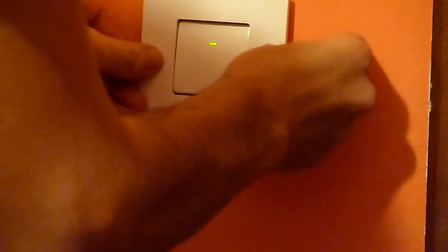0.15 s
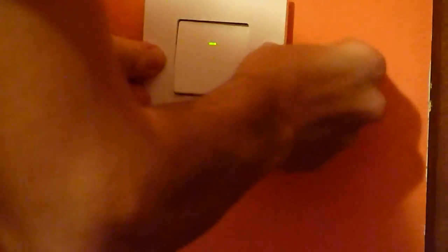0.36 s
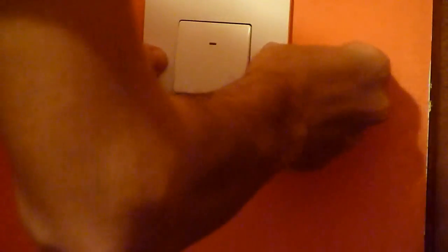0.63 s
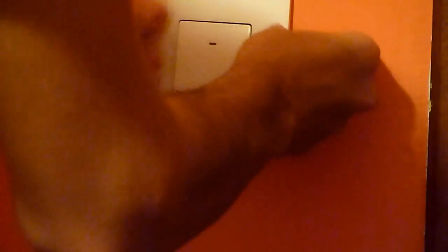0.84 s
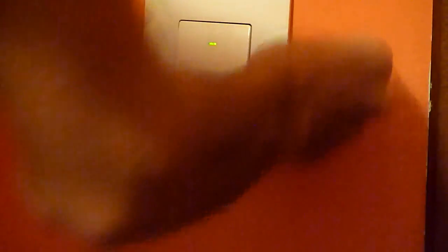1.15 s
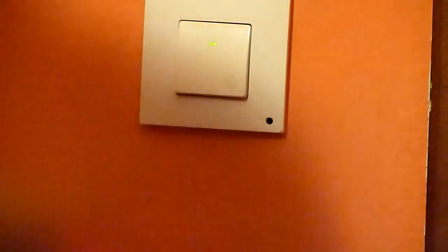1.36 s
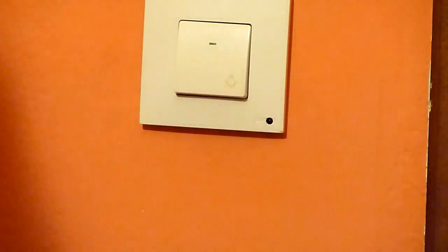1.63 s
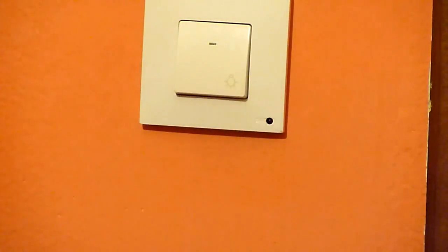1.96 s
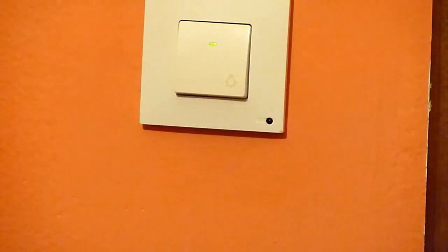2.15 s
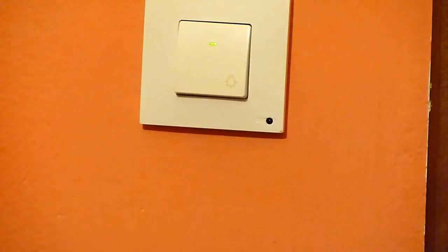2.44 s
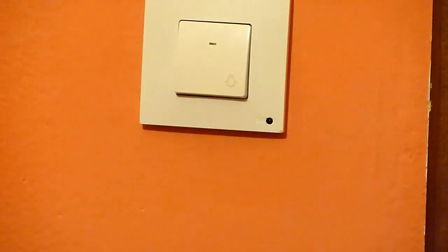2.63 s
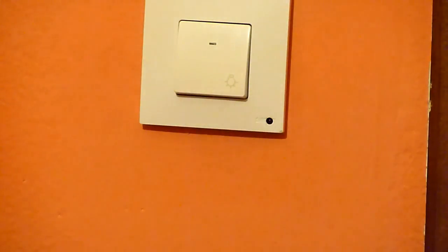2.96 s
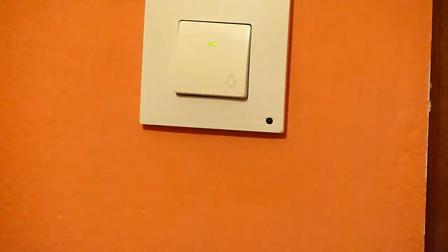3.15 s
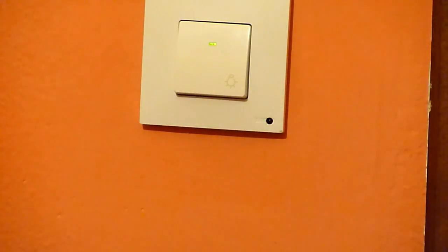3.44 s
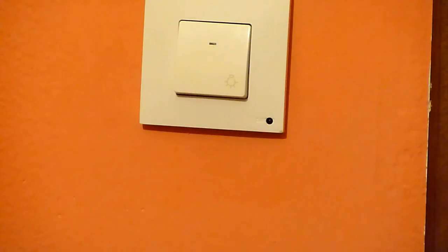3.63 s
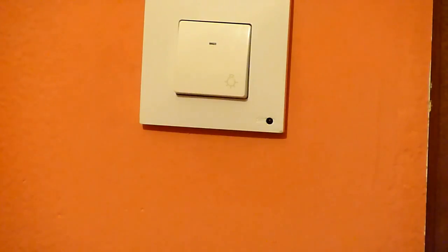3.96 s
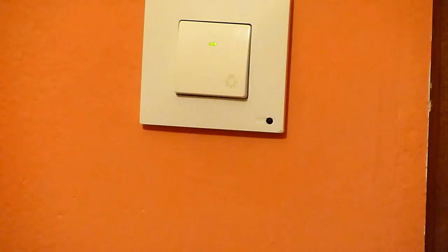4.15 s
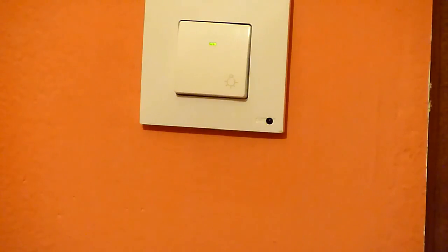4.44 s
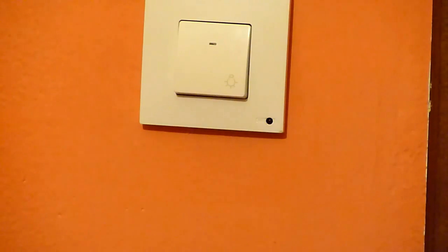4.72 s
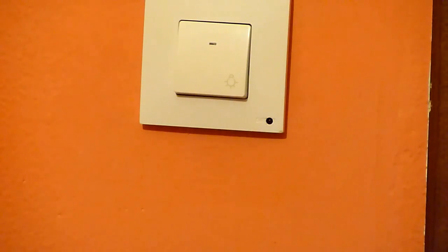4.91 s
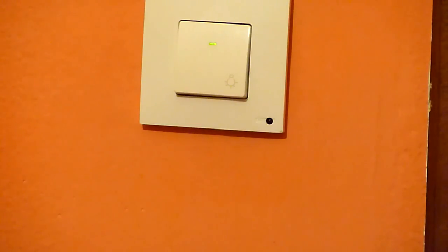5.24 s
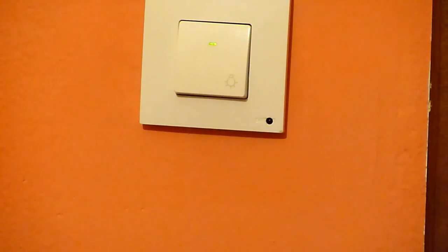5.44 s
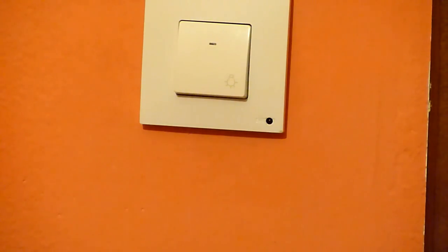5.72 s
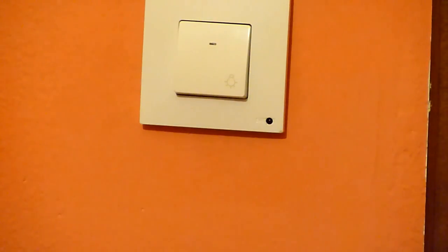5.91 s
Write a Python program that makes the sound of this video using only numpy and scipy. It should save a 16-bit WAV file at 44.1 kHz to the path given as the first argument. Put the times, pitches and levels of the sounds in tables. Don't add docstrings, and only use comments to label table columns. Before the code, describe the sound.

A plastic wall button snaps loudly up close in a small bare room, soft footsteps and cloth rustle follow, then a relay drops with a rattle.

```python
import sys
import numpy as np
from scipy import signal
from scipy.fft import rfft, irfft, next_fast_len
from scipy.io import wavfile
from scipy.ndimage import map_coordinates

SR = 44100
rng = np.random.default_rng(int(sys.argv[2]) if len(sys.argv) > 2 else 0)


def dump(signal):
    limited = np.clip(np.atleast_2d(signal).T, -1, 1)
    pcm = np.round(limited * 32767).astype(np.int16)
    wavfile.write(sys.argv[1], SR, pcm)


def undo_db(level):
    steps = np.asarray(level, float) / 20
    return 10 ** steps


N = 268128


def unit(x):
    return x / np.sqrt(np.mean(x ** 2) + 1e-20)


def along(points, hz):
    point_hz, value = np.transpose(points)
    return np.interp(np.log(hz + 1), np.log(point_hz + 1), value)


def wobble(knots_per_s):
    knots = rng.standard_normal(int(N * knots_per_s / SR) + 4)
    return map_coordinates(knots, [np.arange(N) * knots_per_s / SR])


def roll(x):
    return 1 / (1 + np.sqrt(2) * 1j * x - x * x)


def filtered(x, response):
    n = x.shape[-1]
    size = next_fast_len(n + 8192)
    return irfft(rfft(x, size) * response(np.fft.rfftfreq(size, 1 / SR)), size)[..., :n]


def resonances(modes):
    def mode(f, k, center_hz, width_hz, level_db):
        damping = 1j * f * width_hz
        return (-1) ** k * undo_db(level_db) * damping / (center_hz * center_hz - f * f + damping)
    return lambda f: sum(mode(f, k, *row) for k, row in enumerate(modes))


# pitch_hz, likeness_0_to_1
PORT_LIKENESS = [(100, 0.93), (400, 1), (1200, 0.91), (2400, 0.73), (4500, 0.36), (8000, 0.12),
                 (14000, 0.11)]


def paired(pair, spectrum):
    def mid_side(hz):
        angle = np.arccos(np.clip(along(PORT_LIKENESS, hz), -1, 1)) / 2
        return undo_db(along(spectrum, hz)) * [np.cos(angle), np.sin(angle)]
    mid, side = filtered(pair, mid_side)
    return np.array([mid + side, mid - side])


def noise(spectrum):
    return unit(paired(rng.standard_normal((2, N)), spectrum))


# pitch_hz, t60_s
ROOM_DECAY = [(200, 0.62), (700, 0.22), (3000, 0.22), (6000, 0.21), (12000, 0.18)]


def in_room(blow, wet_db, spread_s):
    n = len(blow)
    age_s = np.arange(n) / SR
    hz, frame_s, grid = signal.stft(rng.standard_normal((2, n)), SR, nperseg=256)
    decay = undo_db(-60 * frame_s / along(ROOM_DECAY, hz)[:, None])
    tail = signal.istft(grid * decay, SR, nperseg=256)[1][:, :n]
    thickening = 1 - np.exp(-age_s / np.clip(spread_s, 2e-4, 1))
    tail = paired(tail * thickening, [(1, 0)])
    scatter = rng.standard_normal((2, n)) * undo_db(-60 * age_s / 0.016)
    scatter = filtered(scatter / np.linalg.norm(scatter[0]), lambda f: -(f / 7500) ** 2 * roll(f / 7500))
    direct = filtered(signal.unit_impulse(n), lambda f: roll(f / 7500)) + scatter
    echo = direct + undo_db(wet_db) * tail / np.linalg.norm(tail[0])
    return signal.fftconvolve(blow[None], echo, axes=1)[:, :n]


def add(track, start_s, sound):
    part = track[:, round(start_s * SR):][:, :sound.shape[1]]
    part += sound[:, :part.shape[1]]


def swells(peaks, rise_db_s, fall_db_s, rest_db):
    peak_s, level_db = np.transpose(peaks)[:, :, None]
    late_s = np.arange(N) / SR - peak_s
    slope_db_s = np.where(late_s < 0, -rise_db_s, fall_db_s)
    return np.sqrt(undo_db(rest_db) ** 2 + np.sum(undo_db(level_db - slope_db_s * late_s) ** 2, axis=0))


def hardened(contacts, top_hz, softens):
    return [(start_s, peak_db, top_hz * undo_db(softens * peak_db)) for start_s, peak_db in contacts]


def mechanism(contacts, modes, wet_db, trim_db):
    track, blow = np.zeros((2, N)), signal.unit_impulse(SR // 3)
    for start_s, peak_db, hard_hz in contacts:
        housing = resonances([(hz, width_hz, db + rng.normal(0, 1.5)) for hz, width_hz, db in modes])
        ring = filtered(blow, lambda f: housing(f) * roll(f / hard_hz) ** 2)
        ring = undo_db(peak_db + trim_db) * ring / np.abs(ring).max()
        add(track, start_s, in_room(ring, wet_db, spread_s=0.0013))
    return track


def soft_contacts(rows):
    track, blow = np.zeros((2, N)), signal.unit_impulse(SR // 3)
    for start_s, level_db, low_hz, high_hz, edge_db, scrape_s in rows:
        def response(f):
            band = roll(f / high_hz) ** 4 * (1j * f / low_hz) ** 2 * roll(f / low_hz)
            edge = undo_db(edge_db) * 1j * f / (6000 + 1j * f) * roll(f / 10500) ** 2
            return band + edge
        rub = filtered(blow, response)
        rub = undo_db(level_db + 16) * rub / np.linalg.norm(rub)
        add(track, start_s, in_room(rub, wet_db=12, spread_s=scrape_s))
    return track


# pitch_hz, level_db_rms, unsteadiness_db
HUM_TONES = [(119.8, -55.5, 1.5), (191, -64.5, 2.5), (210.4, -69.5, 1.5), (267.5, -71.5, 3),
             (315.4, -73.5, 4), (592, -76, 4)]


def hum():
    t_s = np.arange(N) / SR
    tones = np.zeros(N)
    for hz, level_db, loose_db in HUM_TONES:
        gain = undo_db(level_db + 2.5 + loose_db * wobble(5))
        tones += gain * np.sin(2 * np.pi * hz * t_s + 0.21 * loose_db * wobble(4.16))
    return tones


# pitch_hz, density_db_per_hz
AIR_SPECTRUM = [(20, -9), (40, -10.5), (90, -7), (140, 3), (172, 8), (230, -4), (320, -1.5), (600, -3.5),
                (900, -8.5), (1400, -28.5), (2500, -34.5), (5000, -45)]


def air():
    return undo_db(-58.5 + 2.5 * wobble(3.15)) * noise(AIR_SPECTRUM)


# pitch_hz, density_db_per_hz
HISS_SPECTRUM = [(30, 6), (300, 6.5), (1200, 7.5), (2500, 1), (6000, -3.5), (14000, -6.5), (15500, -12)]


def hiss():
    white = rng.standard_normal((2, N))
    return undo_db(-60.5) * unit(filtered(white, lambda hz: undo_db(along(HISS_SPECTRUM, hz))))


# start_s, end_s
FOCUS_HUNTS = [
    (.005, .25),
    (1.925, 6.05),
]
# pitch_hz, width_hz, level_db
LENS_OUT_MODES = [(3290, 60, 3), (3390, 60, 5)]
# pitch_hz, width_hz, level_db
LENS_BACK_MODES = [(1590, 40, 3), (3390, 60, -6)]


def focus():
    starts_s = np.concatenate([np.arange(start_s, end_s, .16) for start_s, end_s in FOCUS_HUNTS])
    steps_s = starts_s[:, None] + np.arange(5) / 99.6
    buzz = np.zeros(N)
    for delay_s, modes in ((0, LENS_OUT_MODES), (.08, LENS_BACK_MODES)):
        at = np.round((steps_s + delay_s) * SR).astype(int).ravel()
        strength = undo_db(1.2 * rng.standard_normal(len(at)))
        buzz += filtered(np.bincount(at, strength, N + SR)[:N], resonances(modes))
    phase_rad = np.array([[1.25], [-1.25]])
    return undo_db(-23) * filtered(buzz, lambda f: np.exp(1j * phase_rad) * (f > 0))


# peak_s, level_db
HAND_SWAYS = [
    (.1, -72),
    (.56, -59.5),
    (.98, -59),
    (1.51, -65),
    (2.71, -83),
    (3.56, -70),
    (5.11, -82),
    (5.33, -77),
]


def tremor():
    shake = noise([(8, -9.5), (24, -17), (31, -13), (50, -31), (80, -120)])
    grip = swells(HAND_SWAYS, rise_db_s=55.5, fall_db_s=57, rest_db=-88)
    grip = grip + swells([(.47, -38)], rise_db_s=289.5, fall_db_s=250, rest_db=-np.inf)
    return grip * (shake[0] + 0.086 * shake)


# start_s, peak_db, hardness_hz
NAIL_CONTACTS = [
    (.052, -38, 19986),
    (.060, -36.5, 19998),
    (.070, -63, 20000),
]
# pitch_hz, width_hz, level_db
NAIL_MODES = [(646, 100, 4.5), (3800, 380, -5.5), (6420, 160, 1.5), (8950, 1000, -5.5), (13000, 3000, -7)]
# start_s, peak_db, hardness_hz
PRESS_CONTACTS = [
    (.2965, -36, 7000),
    (.306, -36, 6000),
    (.316, -41, 5000),
]
# pitch_hz, width_hz, level_db
ROCKER_MODES = [(500, 180, -7), (1110, 440, 1.5), (1800, 990, -3.5), (3170, 1100, -7), (4640, 820, -2.5),
                (6900, 1200, -11)]


def thumb():
    graze = mechanism(NAIL_CONTACTS, NAIL_MODES, wet_db=5.5, trim_db=2.0)
    return graze + mechanism(PRESS_CONTACTS, ROCKER_MODES, wet_db=10, trim_db=-0.5)


# pitch_hz, density_db_per_hz
SWISH_SPECTRUM = [(200, -11), (400, 0), (800, -7), (1500, -2.5), (3000, -4.5), (5000, -7), (8000, -29)]
# pitch_hz, density_db_per_hz
BRUSH_SPECTRUM = [(2000, -12), (4000, -3), (6000, 2), (9000, -0.5), (13000, -0.5), (16000, -12)]
# peak_s, swish_db, brush_over_swish_db
CLOTH_GESTURES = [(.15, -71, -5), (.46, -74.5, 4), (1.3, -71, -8), (1.6, -60, -2.5), (1.8, -62.5, 0),
                  (2.08, -68, 7.5), (2.25, -64.5, 4), (2.55, -59.5, -4.5), (2.7, -66, 1),
                  (3.06, -56.5, -3.5), (3.2, -61.5, -6), (3.59, -55.5, -3.5), (3.86, -56.5, 0.5),
                  (4.02, -57, -2.5), (4.57, -52.5, -4), (4.96, -69, 0), (5.16, -62.5, -20)]


def cloth():
    swish_peaks = [(peak_s, db) for peak_s, db, _ in CLOTH_GESTURES]
    brush_peaks = [(peak_s, db + over_db) for peak_s, db, over_db in CLOTH_GESTURES]
    swish = swells(swish_peaks, rise_db_s=53, fall_db_s=33, rest_db=-73)
    brush = swells(brush_peaks, rise_db_s=53, fall_db_s=33, rest_db=-84)
    grain_db = 1.6 * wobble(40)
    return undo_db(grain_db) * (swish * noise(SWISH_SPECTRUM) + brush * noise(BRUSH_SPECTRUM))


# start_s, peak_db, pitch_hz
LOW_BUMPS = [(.30, -59.5, 64.3), (0.417, -45.5, 57), (.93, -65, 45.4), (1.2, -69, 45), (1.45, -70, 50),
             (1.879, -62, 95), (2.03, -65, 239), (2.09, -56.5, 132.7), (2.48, -67, 70), (2.991, -54, 89),
             (2.999, -55.5, 176.3), (3.16, -70, 50), (3.59, -67, 59.7), (3.96, -65, 60.5),
             (4.92, -72, 65.2), (5.335, -63, 70), (5.334, -54.5, 147.7)]


def bumps():
    track, t_s = np.zeros((2, N)), np.arange(SR // 2) / SR
    for start_s, peak_db, hz in LOW_BUMPS:
        envelope = undo_db(-60 * t_s / 0.36) * (1 - np.exp(-t_s / 0.0034))
        swing = np.sin(2 * np.pi * hz * t_s) * envelope
        add(track, start_s, undo_db(peak_db + 10.5) * swing * np.ones((2, 1)))
    return track


# start_s, peak_db
CREEP_CONTACTS = [
    (.4092, -12.5),
    (.4108, -16),
    (.4135, -14),
    (.4160, -13),
    (.4190, -15.5),
]
# start_s, peak_db
SNAP_CONTACTS = [(.4213, -7), (.4246, 0.5), (.4297, -4.5), (.4316, -6.5), (.4365, -21), (.4428, -13),
                 (.4518, -14.5), (.4558, -16), (.4762, -22), (.4865, -26), (.5040, -30), (.5220, -31.5)]
# pitch_hz, width_hz, level_db
PLATE_MODES = [(650, 158, -6), (1385, 160, -3.5), (3000, 630, -8), (4110, 900, -8), (5360, 490, 4.5),
               (5970, 450, 2.5), (6830, 470, -3), (10800, 2500, -7.5), (13600, 880, -8)]


def button():
    creep = hardened(CREEP_CONTACTS, top_hz=4900, softens=0)
    snap = hardened(SNAP_CONTACTS, top_hz=14000, softens=0.21)
    return mechanism(creep + snap, PLATE_MODES, wet_db=3.5, trim_db=-2.5)


# start_s, level_db, low_hz, high_hz, edge_db
FOOTFALLS = [
    (.907, -57, 500, 2990, -20),
    (2.475, -40.5, 700, 2960, -21),
    (2.515, -63, 704, 3000, -33),
    (2.828, -48, 397, 1820, -46),
    (2.988, -38, 199, 3360, -11),
    (3.407, -39.5, 500, 3160, -16),
    (3.543, -45, 800, 3070, -6.5),
    (3.96, -49.5, 200, 2030, -19),
    (4.622, -47.5, 320, 520, -30),
    (4.624, -46.5, 700, 2460, -28),
]


def footfalls():
    return soft_contacts([(*step, 0.0026) for step in FOOTFALLS])


# start_s, level_db, center_hz, edge_db
CLOTHES_FLICKS = [
    (1.404, -55.5, 2900, -16),
    (1.577, -48.5, 1800, -5.5),
    (1.662, -50, 1740, -6),
    (3.634, -54.5, 3070, -30),
    (4.503, -43, 2840, -13),
    (4.915, -55, 4400, -14),
    (4.972, -54.5, 11800, -33),
]


def flicks():
    return soft_contacts([(start_s, level_db, hz / 1.46, hz * 1.46, edge_db, 0.0053)
                          for start_s, level_db, hz, edge_db in CLOTHES_FLICKS])


# start_s, level_db, low_hz, edge_db, scrape_s
SOLE_DRAGS = [
    (2.63, -47.5, 1200, -5, 0.14),
    (4.03, -48.5, 400, -2, 0.011),
    (4.3, -52, 2000, 6, 0.016),
    (4.461, -44.5, 1900, -11, 0.083),
]


def drags():
    return soft_contacts([(start_s, level_db, low_hz, 5560, edge_db, scrape_s)
                          for start_s, level_db, low_hz, edge_db, scrape_s in SOLE_DRAGS])


# start_s, peak_db, hardness_hz
BOARD_CONTACTS = [
    (1.908, -44, 2000),
    (2.022, -51, 1998),
    (2.036, -39.5, 2302),
    (2.051, -36, 9000),
    (2.0565, -29.5, 9000),
]
# pitch_hz, width_hz, level_db
BOARD_MODES = [(623, 74, -2), (1164, 75, -5), (1655, 49, -1.5), (2320, 120, -3.5), (3550, 320, 2.5),
               (5500, 5000, -12.5)]


def floorboard():
    return mechanism(BOARD_CONTACTS, BOARD_MODES, wet_db=8.5, trim_db=2.5)


# start_s, peak_db, hardness_hz
STUD_CONTACTS = [
    (5.0395, -30, 10000),
]
# pitch_hz, width_hz, level_db
STUD_MODES = [(1250, 410, -3.5), (2640, 280, 7), (4000, 2200, -6), (7500, 3000, -22)]


def tick():
    return mechanism(STUD_CONTACTS, STUD_MODES, wet_db=5.5, trim_db=2.5)


# start_s, peak_db
RELAY_CONTACTS = [(5.3315, -16.5), (5.3328, -15), (5.3345, -12.5), (5.3407, -16), (5.3420, -17.5),
                  (5.3600, -37), (5.3680, -24), (5.3927, -22), (5.3997, -28), (5.4050, -26.5),
                  (5.4218, -38), (5.4330, -31)]
# pitch_hz, width_hz, level_db
CASE_MODES = [(355, 180, -12.5), (800, 200, -6.5), (1120, 150, 0), (1754, 320, 2.5), (2270, 960, -3),
              (4000, 620, 4.5), (4400, 450, -4.5), (5600, 1050, -11.5), (8860, 790, -9),
              (11380, 1400, -10.5)]


def relay():
    lead_in = (5.3266, -29, 2900)  # start_s, peak_db, hardness_hz
    landings = hardened(RELAY_CONTACTS, top_hz=21100, softens=0.3)
    return mechanism([lead_in] + landings, CASE_MODES, wet_db=2.0, trim_db=0.9)


def scene():
    background = hum() + air() + hiss() + focus() + tremor()
    hard = thumb() + button() + floorboard() + tick() + relay()
    soft = cloth() + bumps() + footfalls() + flicks() + drags()
    return (background + hard + soft) * undo_db([[.5], [-.5]])


def band_limit(x):
    return signal.sosfilt(signal.butter(12, 16450, fs=SR, output="sos"), x)


def record(dry):
    def response(hz):
        notch = 1 - .95 * np.exp(-((hz - 7980) / 100) ** 2)
        return notch / (1 + (hz / 15350) ** 200)
    return band_limit(filtered(dry, response))


dry = scene()
out = record(dry)
dump(out)
```